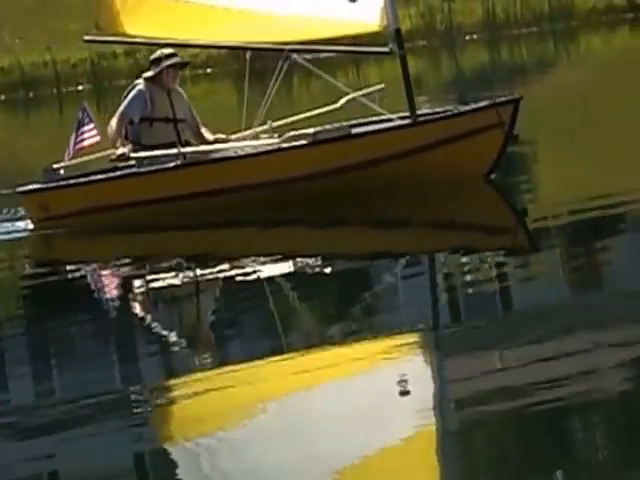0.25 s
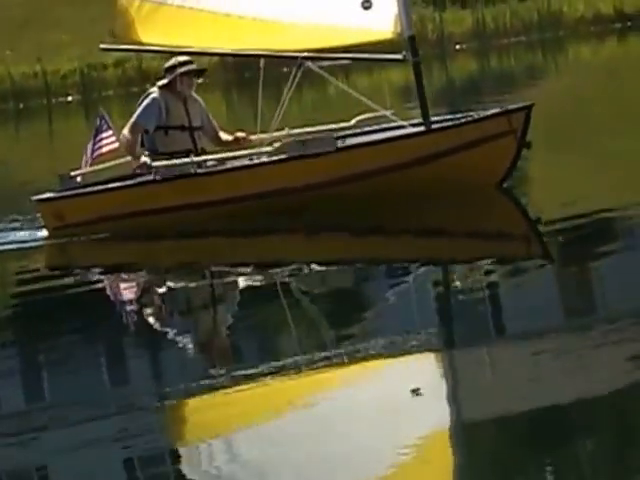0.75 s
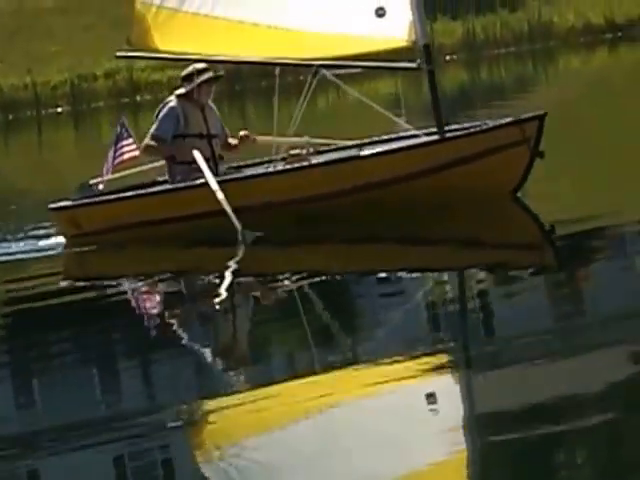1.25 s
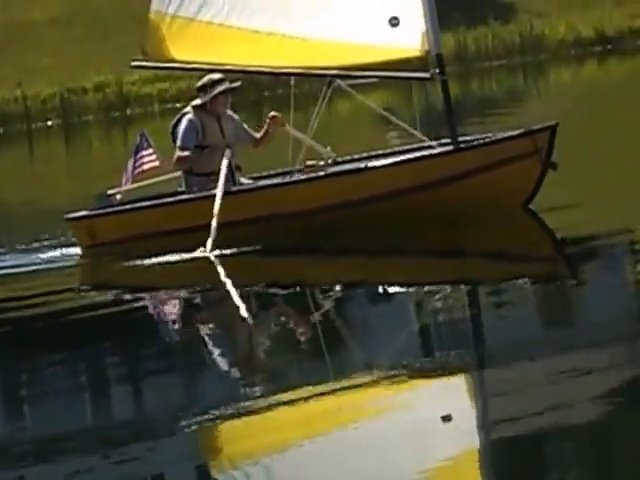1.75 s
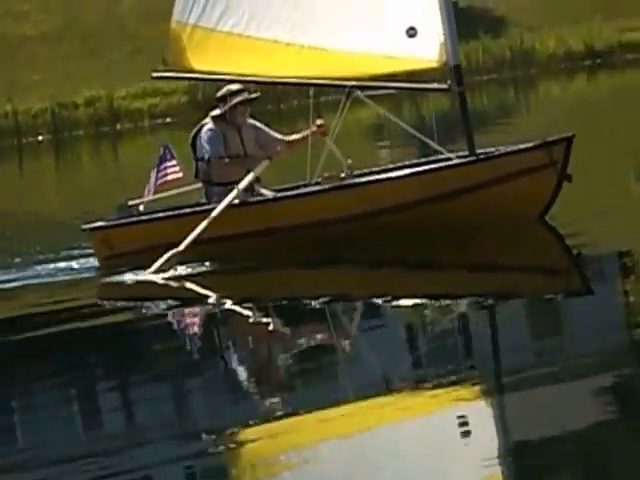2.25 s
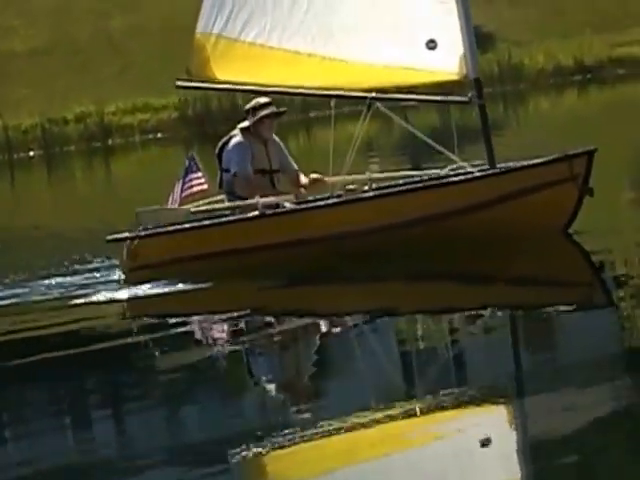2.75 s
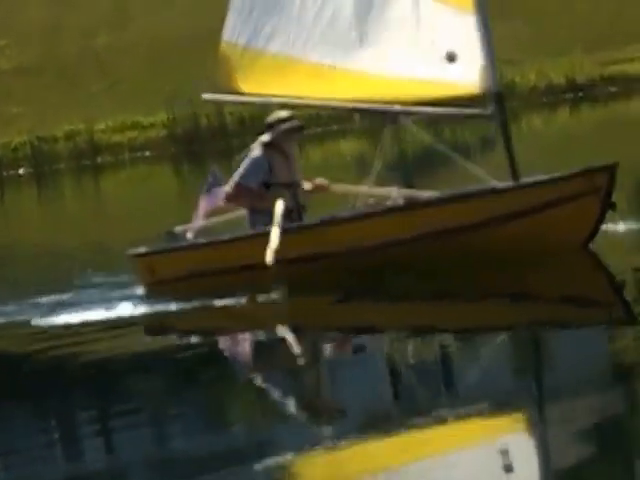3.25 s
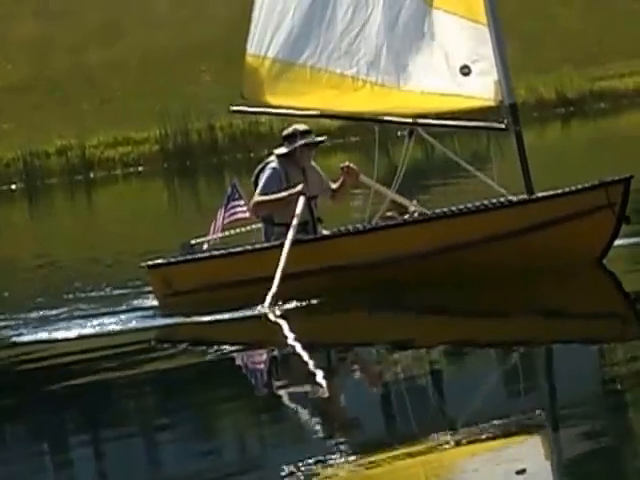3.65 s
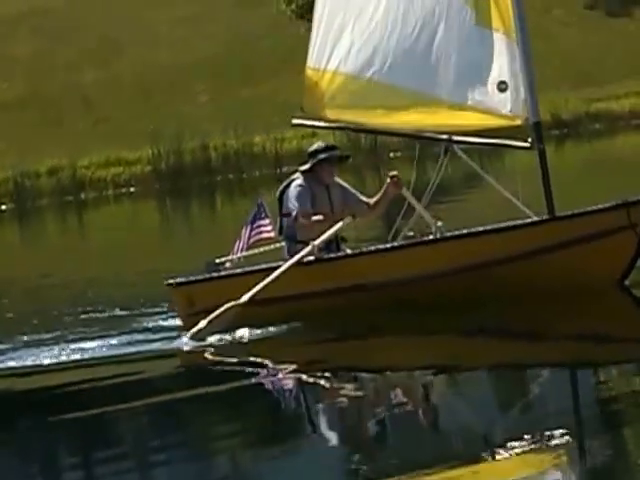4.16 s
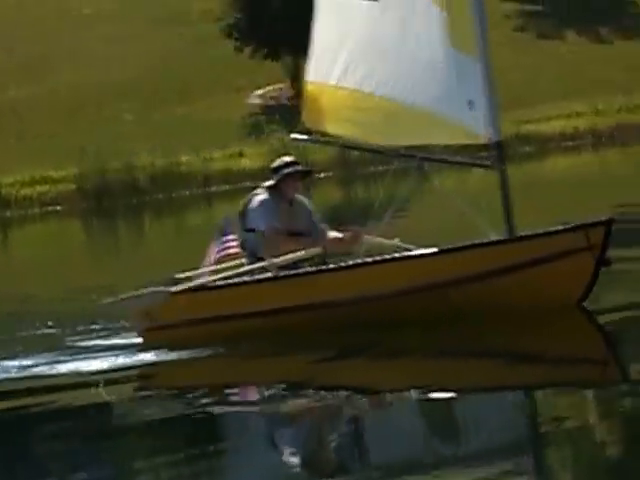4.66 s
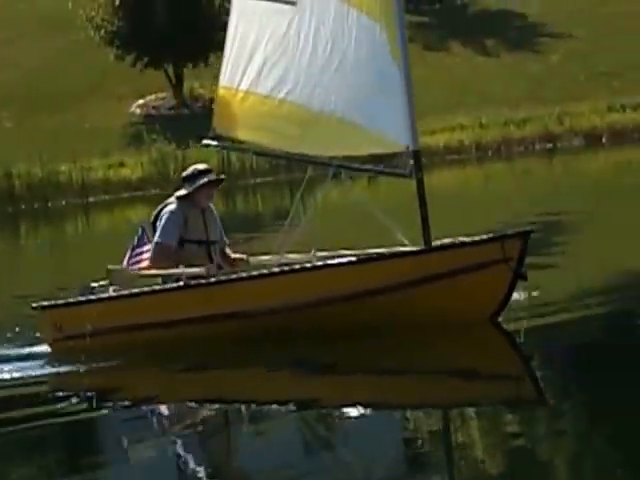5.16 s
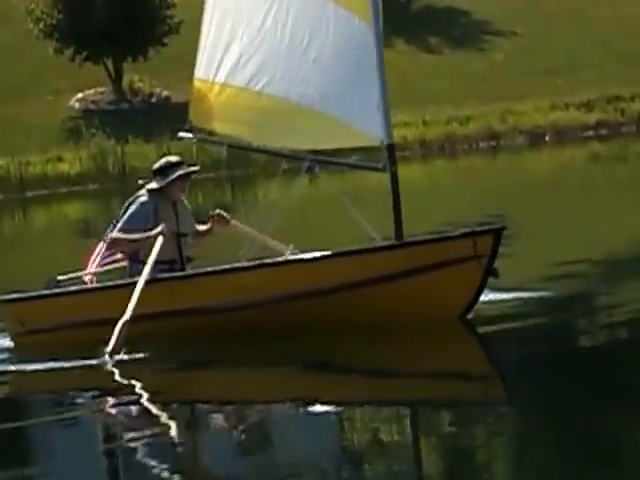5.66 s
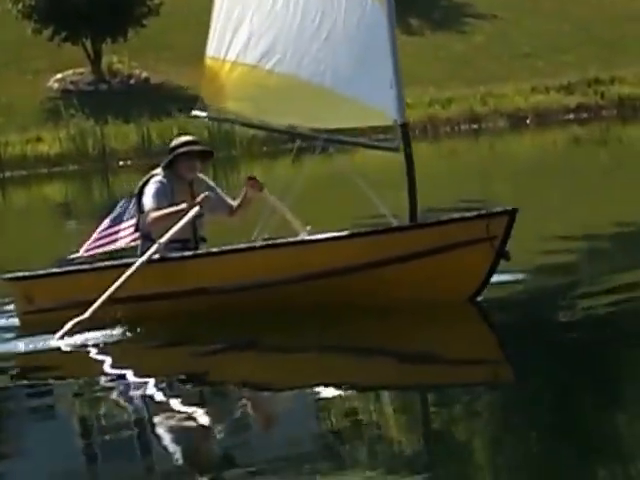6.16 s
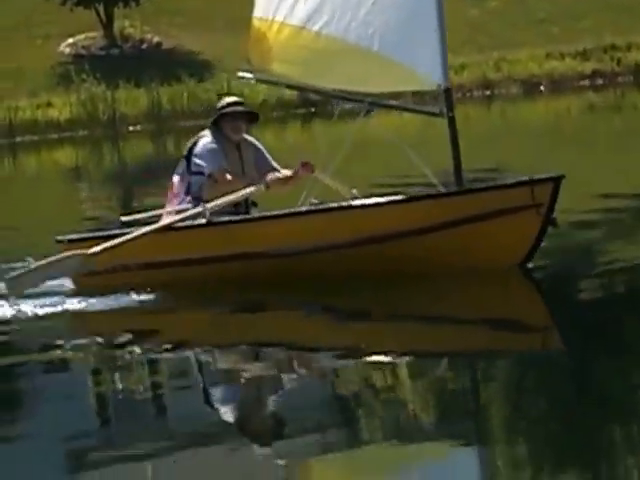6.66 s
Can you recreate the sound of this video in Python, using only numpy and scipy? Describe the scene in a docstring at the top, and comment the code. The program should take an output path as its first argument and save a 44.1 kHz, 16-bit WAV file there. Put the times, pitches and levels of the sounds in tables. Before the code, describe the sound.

A constant high shimmer of katydids and crickets covers a quiet summer pond, with a nearer katydid chirping over three times a second. A rowed wooden dinghy opens with a quick cluster of hollow knocks; three oar strokes follow with light splashes, drips and runoff. A sharp clack comes midway and a firm double knock near the end. A small bird chips in pairs. Open air, stereo, boat slightly left.

```python
"""A summer pond: far katydids shimmer as shaped noise; crickets and nearer katydids sing with pulsed wing tones.
A small bird chips and slurs with sliding whistles. Soft far-off air, hiss and a thin high whine lie under it.
A dinghy is rowed: rattling blows ring its hollow hull, and harder ones clack in the oars and their locks.
The blades stir up noisy splashes full of rising bubble tones. Brief bright swishes of noise pass on the left."""
import sys
import numpy as np
from scipy import signal
from scipy.fft import rfft, irfft, next_fast_len
from scipy.io import wavfile
from scipy.ndimage import uniform_filter1d

SR = 44100
rng = np.random.default_rng(int(sys.argv[2]) if len(sys.argv) > 2 else 0)


def bounce(signal):
    """Save signal as a 16-bit WAV file at the path given by the first command-line argument."""
    frames = np.transpose(np.atleast_2d(signal))
    limited = np.clip(frames, -1, 1)
    pcm = np.round(limited * 32767).astype(np.int16)
    wavfile.write(sys.argv[1], SR, pcm)


N = 303885  # length in samples
T = np.arange(N) / SR  # time in seconds


def undb(db):
    """Turn decibels into a gain."""
    return 10 ** (np.asarray(db) / 20)


def level(x, db):
    """Scale a sound to an rms level."""
    return x * undb(db) / np.sqrt(np.mean(x ** 2))


def strike_level(x, db):
    """Scale a short sound by its total energy, as if spread over 20 ms."""
    return x * undb(db) / np.sqrt(np.sum(x ** 2) / (SR / 50))


def pan(x, side_db):
    """Place a sound by its left minus right level: left is positive."""
    return x * undb(np.array([[side_db], [-side_db]]) / 2)


def add(out, start_s, x):
    """Mix a short sound in at its start time."""
    i = max(int(start_s * SR), 0)
    out[i:i + len(x)] += x[:max(N - i, 0)]


def ring(x, hz, width_hz):
    """Pass a sound through one resonance, with gain 1 at its centre."""
    return signal.lfilter(*signal.iirpeak(hz, hz / width_hz, fs=SR), x)


def body(push, modes):
    """A struck object answers a push with all its resonances at once."""
    return sum(undb(db) * ring(push, hz, width_hz) for hz, width_hz, db in modes)


def along(points, hz):
    """Read a curve between its points on a log-frequency axis."""
    point_hz, value = np.transpose(points)
    return np.interp(np.log(hz + 1), np.log(point_hz), value)


def noise(spectrum, likeness):
    """Stereo noise with a given colour; likeness is the left-right correlation at each pitch."""
    size = next_fast_len(N)
    hz = np.fft.rfftfreq(size, 1 / SR)
    mid, side = rfft(rng.standard_normal((2, size))) * undb(along(spectrum, hz))
    alike = np.clip(along(likeness, hz), -1, 1)
    # more shared sound makes the ears alike, more opposed sound makes them differ
    mid = mid * np.sqrt(1 + alike)
    side = side * np.sqrt(1 - alike)
    return irfft(np.array([mid + side, mid - side]), size)[:, :N]


def walk(rate_hz):
    """A smooth random wander with an rms of 1."""
    hold = int(SR / rate_hz)
    steps = np.repeat(rng.standard_normal(N // hold + 1), hold)
    return level(uniform_filter1d(steps, hold)[:N], 0)


def cycle(rate_hz, wander):
    """Phase 0-1 of a slightly unsteady rhythm."""
    cycles = np.cumsum(rate_hz * (1 + wander * walk(5))) / SR
    return (rng.random() + cycles) % 1


def swell(centre_s, length_s):
    """A rounded rise and fall in loudness."""
    return np.exp(-np.minimum((2 * (T - centre_s) / length_s) ** 2, 10) ** 2)


def scatter(x, t60_s, wet_db):
    """Direct sound plus diffuse returns from reeds, bank and water, different at each ear."""
    t = np.arange(SR // 2) / SR
    fade = np.exp(-np.log(1000) * t / t60_s)  # falls 60 dB in t60_s
    tail = rng.standard_normal((2, len(t))) * fade
    tail /= np.sqrt(np.sum(tail ** 2, axis=1, keepdims=True))
    return x + undb(wet_db) * signal.fftconvolve(x[None], tail, axes=1)[:, :N]


# colour of the outdoor air: pitch_hz, relative level_db (per Hz)
AIR_COLOUR = [(18, -76), (30, -46), (64, -70), (162, -14.5), (326, -2), (408, -4.5), (535, -1), (938, -1),
              (1050, -3), (1680, -4), (2060, -7), (3700, -8), (4640, -6), (5550, -6.5), (6500, -18.5),
              (8450, -42), (14300, -120)]
# likeness of the air at the two ears: pitch_hz, correlation (-1 to 1)
AIR_EAR_LIKENESS = [(150, 1), (450, 0.34), (900, 0.42), (2000, 0.06), (3000, 0.37), (4200, -0.39),
                    (5300, -0.49), (6500, -0.48)]
# thin steady tones: pitch_hz, level_db, left_lead_radians
WHINE_TONES = [(11721, -74, 0), (12067, -81, 0), (15675, -66, 2.7)]


def air():
    """A far-off outdoor murmur of noise that wavers gently, with a steady hiss and thin high tones."""
    waver_db = 0.15 * walk(2.62) + .5 * walk(14)
    murmur = level(noise(AIR_COLOUR, AIR_EAR_LIKENESS) * undb(waver_db), -52)
    hiss_colour = [(3000, -23), (6500, 3.5), (11000, -0.5), (15500, -1.5)]
    hiss = level(noise(hiss_colour, [(6000, 0.11), (12000, 0.0084)]), -56.0)
    whine = 0
    for hz, db, lead in WHINE_TONES:
        angle = 2 * np.pi * hz * T + np.array([[lead], [0]])
        whine = whine + undb(db) * np.sqrt(2) * np.sin(angle)
    return pan(murmur, 3.9) + pan(hiss + whine, 0.72)


# colour of the far katydids: pitch_hz, relative level_db (per Hz)
MEADOW_COLOUR = [(6300, -25), (7000, -16.5), (7500, -6.5), (8100, 3.5), (8600, 7), (9100, 4.5), (9600, 4.5),
                 (9950, -26), (10200, -23)]


def meadow():
    """Countless far katydids merge into a shimmering band of hiss; a lower-voiced patch sings on the left."""
    crowd = noise(MEADOW_COLOUR, [(7000, 0.062), (8200, -.15), (8600, 0.21), (9300, -0.1), (9700, -0.53)])
    # the 8.8 and 23 Hz shimmer differs at each ear; the 6.4 Hz shimmer is shared
    shimmer_db = 0.26 * np.array([walk(8.8), walk(23)]) + 0.14 * walk(6.4)
    patch_colour = [(6500, -25.5), (7400, -8), (8050, -3.5), (8500, -1.0), (9000, -26.5)]
    patch = noise(patch_colour, [(7000, 0.22), (9000, -0.17)])
    crowd = level(crowd * undb(shimmer_db), -46.5)
    patch = level(patch * undb(.8 * walk(7.9)), -53.5)
    return pan(crowd, 1.3) + pan(patch, 12.0)


def wing(hz, spread_hz):
    """The tone of a wing membrane, its pitch scattered by uneven file teeth."""
    return np.sin(2 * np.pi * np.cumsum(hz + spread_hz * walk(700)) / SR)


# far chirping insects: pitch_hz, syllables_per_s, chirps_per_s, level_db, left_minus_right_db
FAR_SINGERS = [(5140, 27, 2.4, -73.5, 13), (4870, 25, 3, -75.5, -7), (4680, 32, 2.4, -73.5, -13),
               (9860, 120, 3.75, -62.5, 11.5)]


def far_chirpers():
    """Crickets and katydids further along the bank group short wing syllables into chirps."""
    out = 0
    for hz, syllable_rate, chirp_rate, db, side_db in FAR_SINGERS:
        syllable = cycle(syllable_rate, .04)
        chirp = np.maximum(np.sin(2 * np.pi * cycle(chirp_rate, 0.206)), 0)
        # the pitch sags as each wing stroke slows
        tone = wing(hz - 450 * (syllable - .5), 82.5)
        pulses = chirp * np.sin(np.pi * syllable) ** 4
        song = scatter(pulses * tone, t60_s=.12, wet_db=-4)
        out = out + pan(level(song * undb(0.58 * walk(10.0)), db), side_db)
    return out


# steady trilling insects: pitch_hz, wing_strokes_per_s, level_db, left_minus_right_db
STEADY_TRILLS = [(9865, 45.9, -56, 6), (9530, 45.9, -62, 5), (8720, 59, -59, 0)]


def trillers():
    """Unbroken trills: the wing sounds on each closing stroke and rests while it opens."""
    out = 0
    for hz, rate, db, side_db in STEADY_TRILLS:
        phase = cycle(rate, .002)
        closing = np.clip(phase / .08, 0, 1)
        stroke = closing * np.clip((.7 - phase) / .08, 0, 1)  # silent for the last 30 % of the cycle
        song = scatter(stroke * wing(hz, 65), t60_s=.06, wet_db=-5)
        out = out + pan(level(song, db), side_db)
    return out


# the interval grows by the drag at every chirp
FIRST_CHIRP_S, CHIRP_EVERY_S, CHIRP_DRAG_S = .315, .2865, .00088
# no two chirps are quite alike; the length spread is in natural-log units
CHIRP_LENGTH_S, CHIRP_LENGTH_SPREAD, CHIRP_SCATTER_DB = 0.065, 0.25, .5
# how hard the nearest katydid sings: time_s, level_db (of its wing strokes, before echoes)
SINGING_EFFORT = [(.3, -48.5), (2.9, -47), (5.2, -46), (5.7, -47.5), (6.8, -50.5)]


def near_katydid():
    """Short chirps on a slowly dragging beat, each a run of quick wing strokes."""
    strokes = np.sin(np.pi * cycle(134, 0.0363)) ** 2
    beat = np.arange(int(N / SR / CHIRP_EVERY_S))
    times = FIRST_CHIRP_S + CHIRP_EVERY_S * beat + CHIRP_DRAG_S * beat ** 2 / 2
    chirps = np.zeros(N)
    for centre_s, (loud, long) in zip(times, rng.standard_normal((len(beat), 2))):
        length_s = CHIRP_LENGTH_S * np.exp(CHIRP_LENGTH_SPREAD * long)
        chirps += undb(CHIRP_SCATTER_DB * loud) * swell(centre_s, length_s)
    effort = undb(np.interp(T, *np.transpose(SINGING_EFFORT)))
    song = level(strokes * wing(9310, 83.3), 0) * chirps * effort
    return pan(scatter(song, t60_s=0.11, wet_db=-6.0), 1.2)


def whistle(from_hz, to_hz, length_s):
    """A thin note that holds its pitch a moment, then slides to another."""
    u = np.linspace(0, 1, int(length_s * SR))
    hz = from_hz + (to_hz - from_hz) * np.sin(np.pi / 2 * u ** 1.4) ** 2
    return np.sin(np.pi * u) * np.sin(2 * np.pi * np.cumsum(hz) / SR)


CHIP_FROM_HZ, CHIP_TO_HZ, CHIP_LENGTH_S = 4870, 4344, 0.0232
CHIP_GAP_S, SECOND_CHIP_DB = .0355, 2  # start to start; the second chip is louder
SLUR_LENGTH_S, SLUR_END_SHARE = .041, 0.63  # every slur ends at the same share of its start pitch
# chips, mostly in pairs: start_s, first_chip_level_db (peak, before flutter), chip_count
BIRD_CHIPS = [(1.845, -48, 2), (2.42, -46.5, 1), (3.113, -48, 2), (3.4, -46, 2), (4.356, -51, 2),
              (5.12, -47.5, 2), (5.572, -48, 2), (6.168, -47.5, 2), (6.776, -51, 2)]
# longer falling slurs: start_s, start_pitch_hz, level_db (peak, before flutter)
BIRD_SLURS = [(.769, 5750, -52), (.9, 4120, -57), (1.035, 4210, -58), (2.338, 5660, -48.5),
              (2.451, 4930, -46), (2.552, 4560, -46), (2.657, 4680, -46.5)]


def bird():
    """A small bird whistles two calls: quick chips, mostly paired, and longer falling slurs."""
    out = np.zeros(N)
    for start_s, db, count in BIRD_CHIPS:
        for k in range(round(count)):
            chip = whistle(CHIP_FROM_HZ, CHIP_TO_HZ, CHIP_LENGTH_S)
            add(out, start_s + k * CHIP_GAP_S, undb(db + k * SECOND_CHIP_DB) * chip)
    for start_s, hz, db in BIRD_SLURS:
        add(out, start_s, undb(db) * whistle(hz, hz * SLUR_END_SHARE, SLUR_LENGTH_S))
    flutter_db = 2.0 * walk(200) + 0.67 * walk(15)
    return pan(scatter(out * undb(flutter_db), t60_s=0.14, wet_db=-5.5), 6.5)


# colour of the swishes: pitch_hz, relative level_db (per Hz)
SWISH_COLOUR = [(300, -31), (1000, -12), (2200, 3), (4000, 3), (7000, 2.5), (12000, 2.5), (15500, -2)]
# brief swishes: centre_s, length_s, level_db
SWISH_TIMES = [(5.895, 0.089, -47.5), (6.061, 0.1, -43), (6.49, 0.034, -40.5), (6.852, 0.094, -46.5)]


def swishes():
    """Short bright hisses: noise made grainy by a fast random flicker in level."""
    bursts = sum(undb(db) * swell(centre_s, length_s) for centre_s, length_s, db in SWISH_TIMES)
    hiss = noise(SWISH_COLOUR, [(500, .7), (3000, 0.14), (12000, -0.2)])
    grainy = level(hiss * undb(3.0 * walk(400)), 0)
    return pan(grainy * bursts, 6.3)


def bubble(hz, cycles):
    """A bubble rings for a few cycles and rises in pitch."""
    t = np.arange(SR // 25) / SR
    return np.sin(2 * np.pi * hz * t * (1 + 4 * t)) * np.exp(-t * hz / cycles)


def splash(centre_s, length_s, pitch_hz):
    """A ragged wash of resonant noise full of small bubbles."""
    cloud = np.zeros(N)
    for when, size, loud in rng.standard_normal((30, 3)):
        pop = bubble(pitch_hz * np.exp(0.337 * size), cycles=7.4)
        add(cloud, centre_s + when * length_s / 3, undb(3.5 * loud) * pop)
    cloud /= np.sqrt(np.sum(cloud ** 2) / (length_s * SR))
    churn = rng.standard_normal(N) * undb(3.9 * walk(90))
    wash = ring(ring(churn, pitch_hz, 1.3 * pitch_hz), pitch_hz, 1.3 * pitch_hz)
    return level(wash, -1.6) * swell(centre_s, length_s) + 0.8 * cloud


CATCH_S, CATCH_DB, CATCH_HZ = 0.099, -0.5, 1400  # blade going in; level relative to splash_db
GURGLE_HZ, LIFT_S, LIFT_HZ = 404, .08, 1020  # pull through the water, then blade coming out
RUNOFF_AFTER_S, RUNOFF_S, RUNOFF_HZ = 0.17, .28, 1863  # finer drops running off the blade
# oar strokes: blade_in_s, blade_out_s, splash_db, gurgle_db, runoff_db (before echoes)
OAR_STROKES = [(1.708, 2.588, -54.5, -77, -58.5), (3.622, 4.221, -57.5, -73, -57.5),
               (6.05, 6.551, -55, -60, -58)]
# the plainest drops off the blade: start_s, level_db (before echoes), starting pitch_hz
BLADE_DRIPS = [(1.861, -50, 1520), (2.28, -57, 2300), (2.592, -53, 960), (2.946, -52.5, 1650),
               (4.232, -52, 890), (4.437, -52, 2820), (6.043, -48.5, 2280), (6.263, -56, 2400),
               (6.665, -56, 3330), (6.725, -53.5, 1580)]


def water():
    """In each stroke the blade slaps in, gurgles low through the pull, plops out and drains; single drops plink."""
    out = np.zeros(N)
    for catch, lift, db, pull_db, runoff_db in OAR_STROKES:
        out += undb(db + CATCH_DB) * splash(catch, CATCH_S, CATCH_HZ)
        out += undb(pull_db) * splash((catch + lift) / 2, (lift - catch) / 2, GURGLE_HZ)
        out += undb(db) * splash(lift, LIFT_S, LIFT_HZ)
        out += undb(runoff_db) * splash(lift + RUNOFF_AFTER_S, RUNOFF_S, RUNOFF_HZ)
    for start_s, db, hz in BLADE_DRIPS:
        add(out, start_s, strike_level(bubble(hz, cycles=4.7), db))
    return pan(scatter(out, t60_s=0.48, wet_db=-4.5), 4.5)


def contact(rattle_s, grit):
    """A blow followed by a dying chatter of wood on wood."""
    t = np.arange(SR // 4) / SR
    force = grit * rng.standard_normal(len(t)) * np.exp(-t / rattle_s)
    force[0] += 1
    return force


# resonances of the hollow hull: pitch_hz, width_hz, relative level_db
HULL_MODES = [(145, 30, -12), (240, 30, -9), (320, 28, 0), (385, 50, -9), (470, 60, -8), (650, 90, -9),
              (807, 55, -4), (965, 60, -2), (1450, 180, -9), (1770, 200, -13), (2280, 110, -10),
              (2950, 400, -15)]


def thump(bright_hz, rattle_s):
    """One blow on the hull: a softer contact carries less treble; the small hull radiates little bass."""
    softness = signal.butter(2, [175, bright_hz], "band", fs=SR, output="sos")
    return body(signal.sosfilt(softness, contact(rattle_s, grit=0.24)), HULL_MODES)


# after each bump the oar judders to rest more softly; level relative to the bump
SETTLE_DB, SETTLE_S, SETTLE_AFTER_S, SETTLE_HZ = -8, 0.056, .025, 830
# oar against hull: start_s, level_db (before echoes), brightness_hz, rattle_decay_s
HULL_BUMPS = [(.1544, -33, 1710, 0.0079), (.1737, -30, 596, 0.0074), (.191, -35.5, 1200, 0.0071),
              (.641, -48, 960, 0.015), (.772, -49.5, 1390, 0.01), (1.648, -54, 1500, .01),
              (1.716, -51.5, 2000, .02), (3.585, -51.5, 3500, .013), (3.734, -55, 400, .02),
              (4.696, -45, 696, 0.024), (4.785, -41, 1970, 0.015), (5.865, -48, 795, 0.01),
              (6.058, -47.5, 1600, 0.016), (6.814, -38, 3000, 0.028), (6.86, -44.5, 1270, 0.046)]
# resonances of oar shaft and lock: pitch_hz, width_hz, relative level_db
OAR_MODES = [(938, 156, 2), (1445, 170, -1), (1620, 170, -10.5), (2135, 340, -4), (2320, 460, -7.5),
             (3390, 200, -7.5), (3810, 300, -5.5), (4440, 230, -4.5), (5820, 1600, -8)]
# oar against lock and gunwale; a harder contact stresses higher resonances:
# start_s, level_db (before echoes), contact_hz, rattle_decay_s
LOCK_CLACKS = [(.163, -33.5, 950, .011), (.164, -39, 2700, 0.0038), (.192, -38.5, 700, 0.0066),
               (.77, -52, 2200, 0.0023), (1.647, -44, 2800, 0.0054), (1.715, -50.5, 2190, 0.0049),
               (2.7565, -34, 1690, 0.0052), (3.583, -51.5, 2550, 0.0036), (4.78, -43.5, 3970, 0.0022),
               (4.785, -40, 720, 0.015), (5.641, -53.5, 2800, .005), (6.8125, -35.5, 3280, 0.0043),
               (6.816, -37.5, 1080, .008), (6.842, -41, 4870, 0.002)]


def oars():
    """Soft bumps boom in the hull and judder to rest; hard clacks ring briefly in shaft and lock."""
    hull, locks = np.zeros(N), np.zeros(N)
    for start_s, db, bright_hz, rattle_s in HULL_BUMPS:
        add(hull, start_s, strike_level(thump(bright_hz, rattle_s), db))
        judder = thump(SETTLE_HZ, SETTLE_S)
        add(hull, start_s + SETTLE_AFTER_S, strike_level(judder, db + SETTLE_DB))
    for start_s, db, hz, rattle_s in LOCK_CLACKS:
        push = ring(contact(rattle_s, grit=0.2), hz, 0.5 * hz)
        add(locks, start_s, strike_level(body(push, OAR_MODES), db))
    boat = scatter(hull, t60_s=0.14, wet_db=-7.5) + scatter(locks, t60_s=0.12, wet_db=-8.5)
    return pan(boat, 5.5)


def scene():
    """Air all round, insects and bird on the bank, swishes, and the boat on the water."""
    bank = meadow() + far_chirpers() + trillers() + near_katydid() + bird()
    return air() + bank + swishes() + water() + oars()


def record(dry):
    """Cut the deep bass, leaving a faint trace of it, and the very top."""
    bass_cut = signal.butter(7, 125, "high", fs=SR, output="sos")
    dry = signal.sosfilt(bass_cut, dry) + undb(-44) * dry
    top_cut = signal.ellip(10, .1, 70, 15850, fs=SR, output="sos")
    return signal.sosfilt(top_cut, dry)


dry = scene()
out = record(dry)
bounce(out)
```